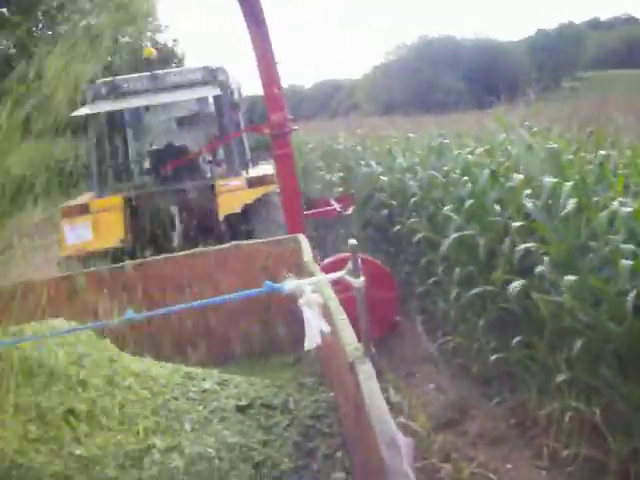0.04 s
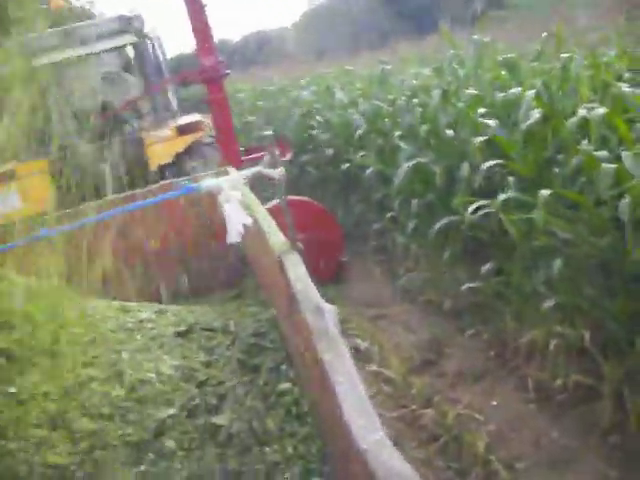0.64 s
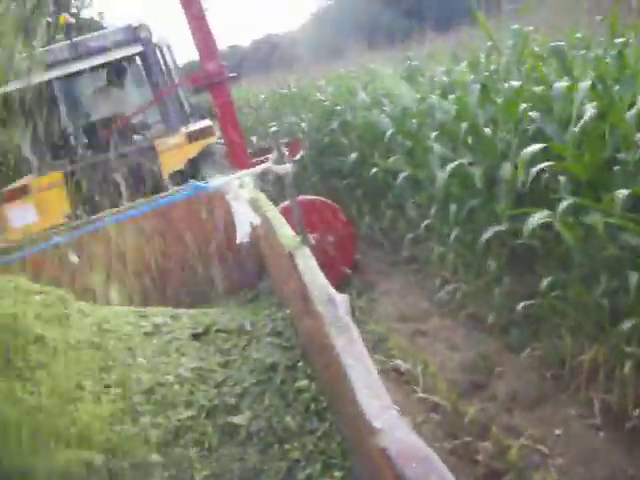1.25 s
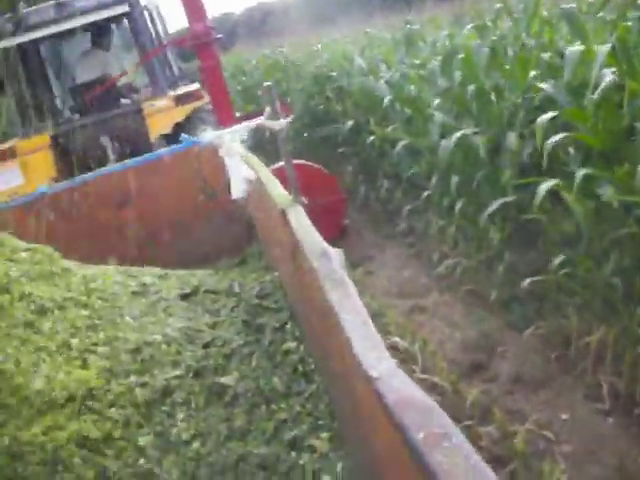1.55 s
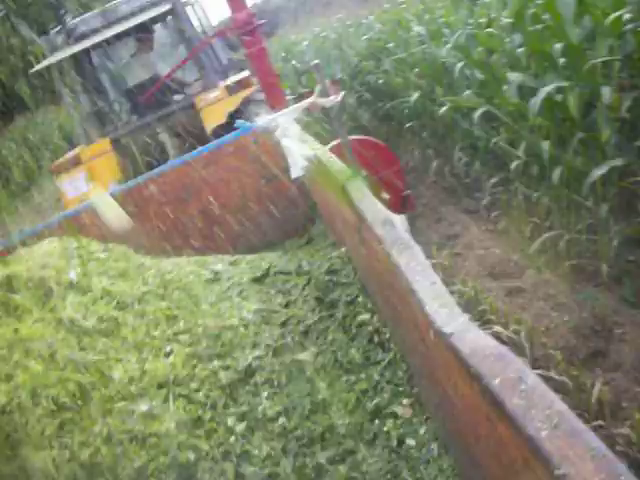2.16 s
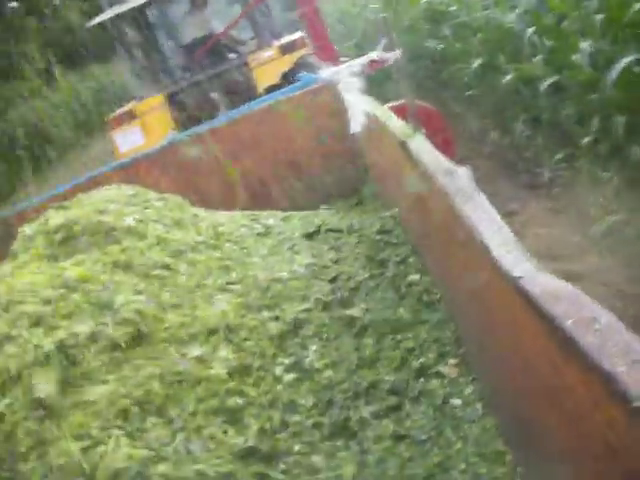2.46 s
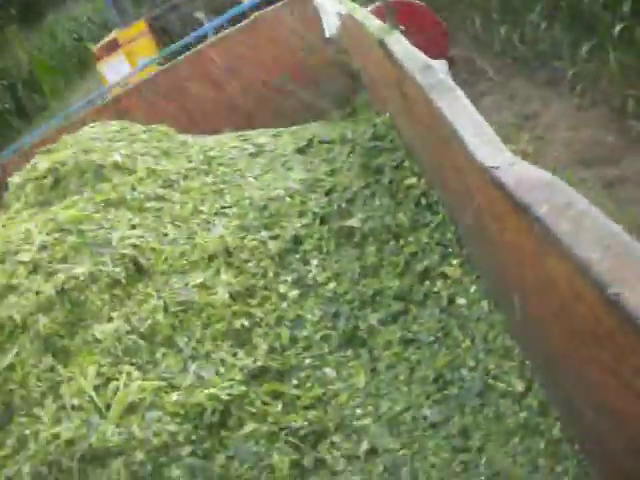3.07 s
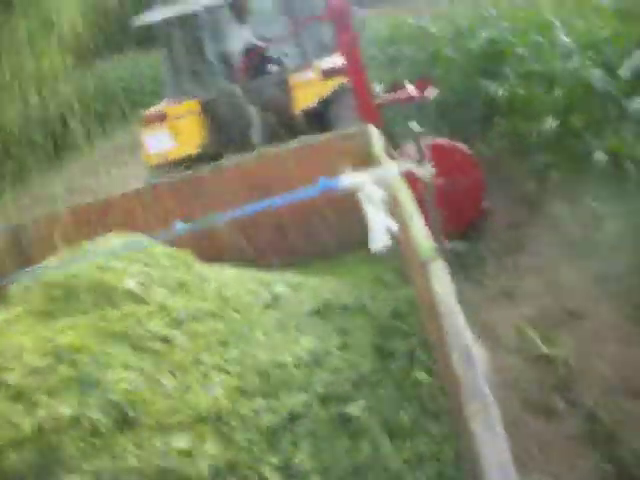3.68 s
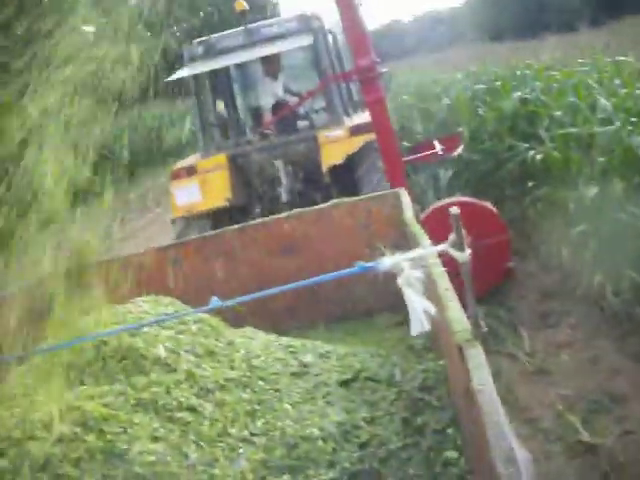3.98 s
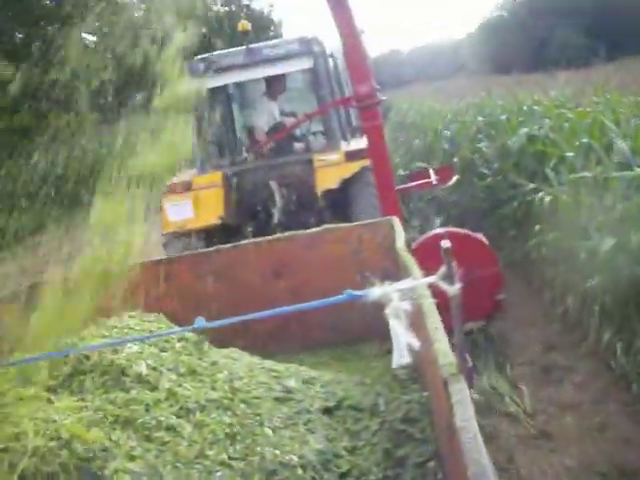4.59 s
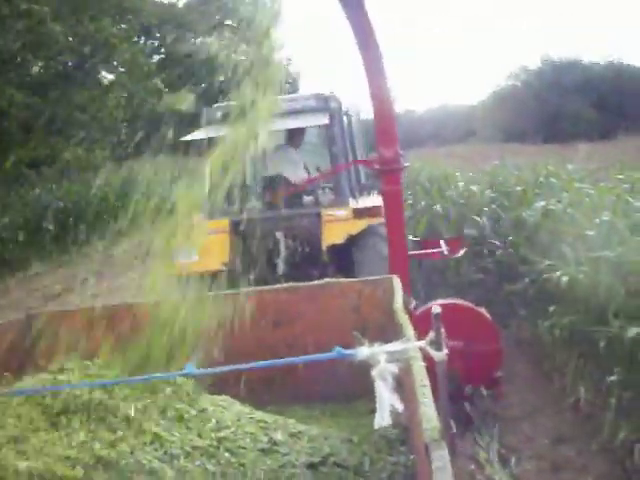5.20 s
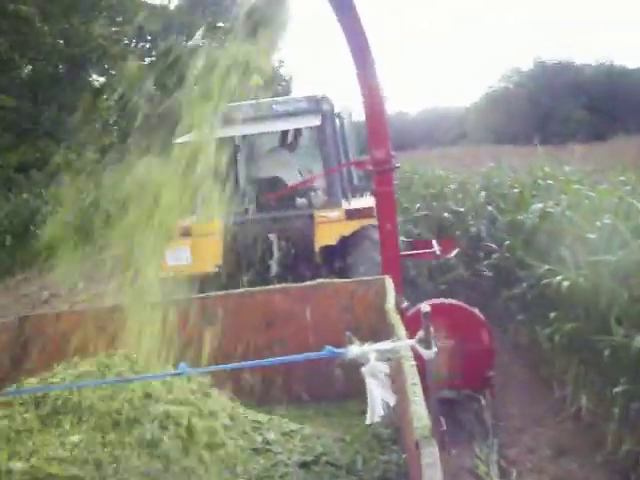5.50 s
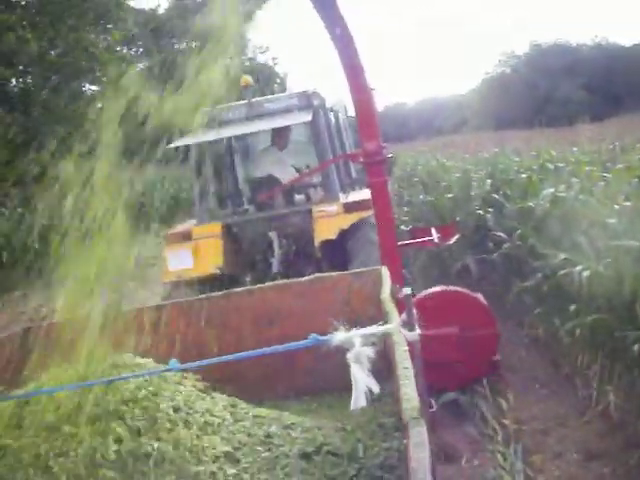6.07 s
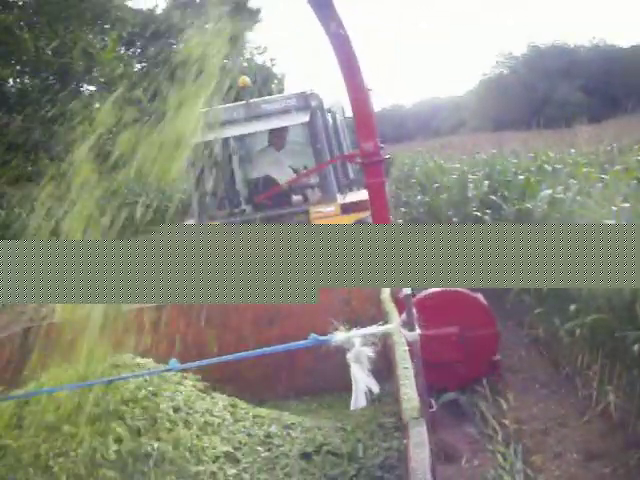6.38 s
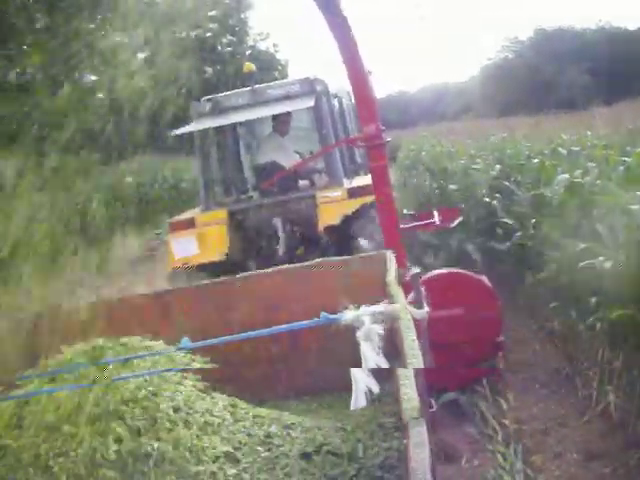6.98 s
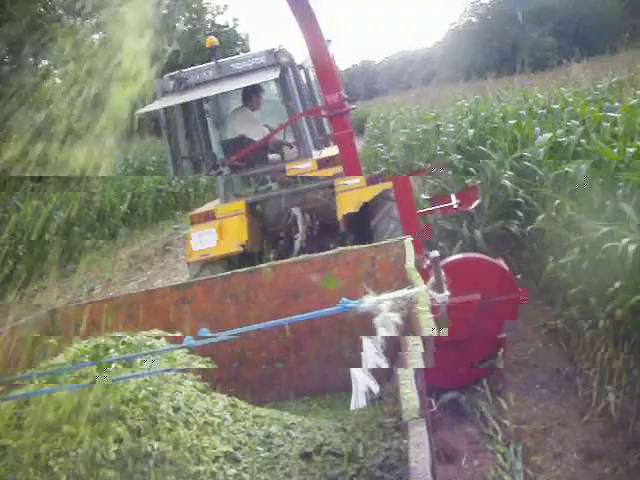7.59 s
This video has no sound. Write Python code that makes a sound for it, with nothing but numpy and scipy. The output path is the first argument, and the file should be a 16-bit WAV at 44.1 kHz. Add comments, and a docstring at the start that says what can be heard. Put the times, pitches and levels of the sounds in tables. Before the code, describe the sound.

A tractor-driven forage harvester howls and rasps through maize, spraying chaff, until the sound cuts out and turns into loud, gritty static.

```python
"""In a trailer being filled by a tractor-driven forage harvester cutting maize.
The chopper's flywheel howls over the diesel's hum and sags under load. Stalks rasp through the knives,
steel squeals, the spout roars and its draught buffets the microphone. Chaff sprays in and taps the camera.
Near the end the small camera fails: its sound sticks, then turns into loud, gritty static."""
import sys
import numpy as np
from scipy import signal
from scipy.fft import rfft, irfft, next_fast_len
from scipy.io import wavfile
from scipy.ndimage import uniform_filter1d

SR = 44100
rng = np.random.default_rng(int(sys.argv[2]) if len(sys.argv) > 2 else 0)


def digitize_waveform(pressure):
    """Quantize a signal to 16-bit integers and store it at the path in sys.argv[1].

    Rows of a 2-D input are taken as channels; values are limited to [-1, 1].
    """
    field = np.atleast_2d(pressure).T
    bounded = np.clip(field, -1, 1)
    quanta = np.round(bounded * 32767).astype(np.int16)
    wavfile.write(sys.argv[1], SR, quanta)


N = 346185
TIME = np.arange(N) / SR

# camera direction: time_s, aim (0 down in the trailer, 1 facing the tractor)
CAMERA_AIM = [(0, 0.87), (.35, 0.5), (1.2, 0.4), (2.1, 0.034), (3.15, 0.066), (3.65, 0.93), (4.5, 0.98),
              (6.1, 1)]
# stalks entering the knives: time_s, feed_db (0 = usual feed)
STALK_FEED = [(0, 5.5), (.3, -1), (.7, 0.5), (1.1, -4.5), (1.4, -1), (2.3, .5), (2.8, 1), (3.25, 2.5),
              (3.7, 4), (3.97, 0), (4.3, 1), (4.7, -6), (5.4, -8.5), (5.75, -11), (6.1, -7.5)]


def undb(db):
    """Decibels to gain."""
    return 10 ** (np.asarray(db) / 20)


def unit(x):
    """Scale to rms 1."""
    return x / np.sqrt(np.mean(x ** 2))


def curves(table):
    """Each column after time_s, interpolated per sample."""
    time_s, *columns = np.transpose(table)
    return [np.interp(TIME, time_s, column) for column in columns]


def walk(rate_hz):
    """Smooth random wander, rms 1."""
    steps = rng.standard_normal(4096)
    path = np.interp(TIME * rate_hz, np.arange(len(steps)), steps)
    return unit(uniform_filter1d(path, int(SR / rate_hz)))


def swell(peak_s, length_s):
    """Half-cosine rise and fall, 1 at peak_s."""
    return np.cos(np.pi * np.clip((TIME - peak_s) / length_s, -.5, .5))


def impacts(per_s, spread_db):
    """Random impulses: many small, a few large."""
    hits = rng.random(N) < per_s / SR
    return hits * undb(spread_db * np.minimum(rng.exponential(size=N), 4.5))


def shape(x, gain):
    """Filter x by gain(hz); rms 1."""
    size = next_fast_len(N)
    hz = np.arange(size // 2 + 1) * SR / size + 1
    return unit(irfft(rfft(x, size) * gain(hz), size)[:N])


def colour(x, spectrum):
    """Filter x by a curve of (freq_hz, level_db) points; rms 1."""
    hz, db = np.transpose(spectrum)
    return shape(x, lambda f: undb(np.interp(np.log(f), np.log(hz), db)))


def ring(x, modes):
    """Drive resonances of alternating polarity with x; rms 1."""
    return shape(x, lambda f: sum((-1) ** i * undb(db) / (1 + 1j * (f - hz ** 2 / f) / width_hz)
                                  for i, (hz, width_hz, db) in enumerate(modes)))


def gusts():
    """Envelope of the strong gusts in the spout's draught."""
    # peak_s, length_s, peak_db
    gust_events = [(.73, 0.55, -18.5), (3.997, 0.27, -20.5), (4.62, 0.34, -31), (5.3, 0.13, -23.5),
                   (5.63, 0.42, -26)]
    return sum(undb(db) * swell(peak_s, length_s) ** 2 for peak_s, length_s, db in gust_events)


def wind(draught_db=-36, facing_db=3, buffet_db=1.6):
    """The spout's draught buffets the microphone, less so down in the trailer."""
    # wind noise: freq_hz, level_db
    spectrum = [(8, -6), (22, -2), (45, 3), (110, 0.5), (200, -4.5), (350, -4.5), (700, -15.5),
                (3000, -45.5)]
    aim, = curves(CAMERA_AIM)
    draught = undb(draught_db + facing_db * aim + buffet_db * walk(8.8))
    return np.hypot(draught, gusts()) * colour(rng.standard_normal(N), spectrum)


def diesel(firing_hz=71, level_db=-28.5, db_per_feed_db=-.4, facing_db=-2, wander_db=.5, drift_rad=.33):
    """The governed engine hums at its firing rate, fuller down in the trailer and on thin feed."""
    # firing_multiple, level_db
    partials = [(1, -0.5), (1.5, -11.5), (2, -13), (5, -12.5)]
    feed_db, = curves(STALK_FEED)
    aim, = curves(CAMERA_AIM)
    hum_db = level_db + db_per_feed_db * feed_db + facing_db * aim + wander_db * walk(3.2)
    phase = 2 * np.pi * firing_hz * TIME + drift_rad * walk(3.6)
    return np.sqrt(2) * sum(undb(hum_db + db) * np.sin(k * phase) for k, db in partials)


def taps(contact_s=.00022, small_db=-17, small_max_db=-5):
    """Soft pieces of maize strike the camera's case: one short push each, with a rebound."""
    # time_s, peak_db
    large_pieces = [(0.066, -5), (.661, 4), (1.775, 0), (2.479, -15), (2.686, -16), (3.256, -3),
                    (3.749, -6), (3.822, -4), (3.960, -1), (4.046, -10), (4.087, -34), (4.214, -24),
                    (4.671, 8.5), (5.008, -1), (5.190, 3), (5.244, -9), (5.443, -3.5), (5.611, 0),
                    (5.894, -17)]
    blows = np.minimum(undb(small_db) * impacts(per_s=24, spread_db=3), undb(small_max_db))
    for time_s, db in large_pieces:
        blows[int(time_s * SR)] += undb(db)
    u = np.arange(-128, 129) / SR / contact_s
    push = (1 - .44 * u ** 2) * np.exp(-u ** 2 / 2)
    return -np.convolve(blows, push, "same")


def chaff_flow(feed_db, level_db=-26, db_per_feed_db=.07, uneven_db=1.3, rise_s=.027, fall_s=.062):
    """Chaff envelope: a stream that follows the feed and is blown aside by gusts, plus spurts."""
    # thick spurts landing near the camera: peak_s, peak_db
    spurts = [(0.031, -21.5), (.31, -24), (.44, -25.5), (.58, -21), (.81, -22.5), (1.12, -25.5),
              (1.28, -28), (2.46, -24), (2.661, -24), (3.01, -21.5), (3.2, -24), (3.31, -26.5), (3.48, -27),
              (3.85, -28), (4.28, -22.5), (4.5, -23.5), (4.68, -24.5), (4.88, -22), (5.02, -27.5),
              (5.36, -26.5), (5.51, -21.5), (5.86, -27.5)]
    stream = undb(level_db + db_per_feed_db * feed_db + uneven_db * walk(11))
    stream /= 1 + gusts() / undb(-16)  # a -16 dB gust halves it
    power = stream ** 2
    for peak_s, db in spurts:
        age_s = TIME - peak_s
        width_s = np.where(age_s < 0, rise_s, fall_s)
        power += undb(db) ** 2 * np.exp(-np.minimum((age_s / width_s) ** 2, 20))
    return np.sqrt(power)


def chaff_spray(settle_s=.005, flicker_db=.9):
    """Chaff lands on the heap: dense ticks and a hiss that jumps as each clump hits and settles."""
    # falling chaff: freq_hz, level_db
    spectrum = [(400, -15), (1500, 2), (2500, 0), (3200, -2.5), (3700, -3.5), (4800, -4.5), (5500, -2),
                (6200, -1.5), (7500, -51)]
    ticks = impacts(per_s=2500, spread_db=3) * rng.standard_normal(N)
    landings = impacts(per_s=60, spread_db=2)
    clumps = signal.lfilter([1], [1, -np.exp(-1 / (settle_s * SR))], landings)
    hiss = rng.standard_normal(N) * np.sqrt(1 + clumps)
    return unit(colour(ticks, spectrum) + colour(hiss, spectrum)) * undb(flicker_db * walk(40))


def side_wall(x, base_s=.0045, turn_s=.0007, sway_s=.00005, echo_gain=.27):
    """Echo off the trailer's steel side; the path changes as the camera turns and sways."""
    aim, = curves(CAMERA_AIM)
    lag_s = base_s + turn_s * aim + sway_s * walk(3)
    return (x + echo_gain * np.interp(TIME - lag_s, TIME, x)) / np.hypot(1, echo_gain)


def squeals(waver_hz=5.6, chatter_db=3):
    """Steel rubs on steel in the chopper: thin tones swell, chatter and fade."""
    # peak_s, length_s, pitch_hz, level_db
    rubs = [(0.102, .35, 2015, -37.5), (0.103, .35, 1734, -30.5), (1.11, .5, 2300, -30.5),
            (1.13, 0.51, 1428, -27), (3.37, .15, 1990, -30), (3.501, .22, 2280, -32),
            (4.763, .14, 2620, -31.5)]
    out = 0
    for peak_s, length_s, hz, db in rubs:
        phase = 2 * np.pi * np.cumsum(hz + waver_hz * walk(25)) / SR
        out += undb(db) * swell(peak_s, length_s) * np.sin(phase)
    return np.sqrt(2) * out * undb(chatter_db * walk(50))


def knife_rasp(cycles, cuts_per_cycle=3, scatter_s=.00009, force_db=1.5, tear_gain=2.4, tear_depth=.79):
    """Knives shear stalks with uneven timing and force; torn fibres hiss once a cycle."""
    # chopper housing resonances: freq_hz, width_hz, level_db
    housing_modes = [(1421, 61, 10), (1768, 140, 1.5), (1982, 81, 1.5), (2350, 374, -1)]
    rate_hz = np.gradient(cycles) * SR
    cut_count = np.floor(cuts_per_cycle * (cycles + rate_hz * scatter_s * walk(45)))
    cuts = np.diff(cut_count, prepend=cut_count[0]) * undb(force_db * rng.standard_normal(N))
    fibres = rng.standard_normal(N) * (1 + tear_depth * np.cos(2 * np.pi * cycles))
    return unit(ring(cuts, housing_modes) + tear_gain * ring(fibres, housing_modes))


def blower(cycles, throb_depth=.21, surge_db=2.5):
    """Air and crop roar up the spout, throbbing with the paddles."""
    # spout resonances: freq_hz, width_hz, level_db
    spout_modes = [(102, 43, -1.5), (310, 110, -5.5), (546, 140, -1.5), (709, 42, 2.5), (857, 70, 1.5),
                   (1115, 145, 4.5), (1240, 490, -2)]
    # time_s, level_db
    roar_levels = [(0, -24), (.5, -22), (1.15, -26), (2.7, -27), (3.0, -19.5), (3.3, -25.5), (3.55, -21),
                   (3.9, -20), (4.05, -24), (4.45, -23.5), (5.0, -20.5), (5.7, -20.5), (6.1, -24.5)]
    roar_db, = curves(roar_levels)
    air = rng.standard_normal(N) * (1 + throb_depth * np.cos(2 * np.pi * cycles))
    return ring(air, spout_modes) * undb(roar_db + surge_db * walk(30))


def flywheel(free_hz=97.02, judder_per_hz=.0014):
    """Cycles run and sag in rate; the more the crop drags the wheel down, the more it judders."""
    # flywheel fundamental: time_s, rate_hz
    speed = [(0, 96.25), (.15, 96.3), (.33, 94.35), (.88, 94.03), (1.02, 95.2), (1.2, 95.9), (1.62, 96.33),
             (2.88, 97.04), (3.12, 95.55), (3.4, 96), (3.87, 93.77), (4.15, 96), (4.32, 93.53),
             (4.6, 93.26), (4.76, 94.5), (5.1, 94), (5.75, 95.84), (6.1, 96.6)]
    rate_hz, = curves(speed)
    sag_hz = np.maximum(free_hz - rate_hz, 0)
    cycles = np.cumsum(rate_hz * (1 + judder_per_hz * sag_hz * walk(16))) / SR
    return cycles, sag_hz


def howl(cycles, sag_hz, feed_db, wander_db=1.88, jitter_rad=.089, smear_rad=.25, growl_rad_per_hz=.25):
    """Flywheel harmonics: they shift with feed and camera aim, and flutter more under load."""
    # harmonic, down_db, facing_db, db_per_feed_db, db_per_sag_hz
    harmonics = [(2, -33.5, -37, -0.5, 0.5), (3, -25.5, -36.5, -0.7, 0), (4, -29, -23.5, -0.18, -2.5),
                 (5, -29.5, -33.5, -.8, -1.84), (7, -34, -23.5, 0.02, -2.4), (8, -41.5, -39.5, 0, -0.5),
                 (10, -39.5, -35.5, 1.9, -2), (11, -32.5, -35, 0.5, 0.5), (12, -25.5, -30.5, 0.5, -2.5),
                 (14, -46.5, -37.5, 1.5, 0.5), (15, -33.5, -36, -0.4, -2), (16, -37.5, -48, 2.9, -3),
                 (18, -35, -42, 3, -3), (21, -38, -40.5, -0.2, -0.5), (24, -40.5, -44.5, 0.5, 1.5)]
    # 6th harmonic, near a spout resonance, growls under load: time_s, level_db
    sixth = [(0, -23.5), (.2, -35), (.45, -24.5), (.7, -28), (.95, -24), (1.35, -26), (1.75, -30),
             (2.7, -33), (3.6, -32.5), (3.8, -26), (4.3, -32.5), (5.42, -24.5), (5.68, -35.5), (6.1, -29)]
    # 9th harmonic, the main whine: time_s, level_db
    ninth = [(0, -38), (.6, -24), (1.25, -27), (1.52, -24.5), (2.15, -24), (2.7, -28), (3.1, -25),
             (3.6, -28), (4.4, -24.5), (4.7, -19.5), (5.05, -25), (5.75, -20), (6.1, -24.5)]
    aim, = curves(CAMERA_AIM)
    tones = [(6, curves(sixth)[0], growl_rad_per_hz * sag_hz), (9, curves(ninth)[0], 0)]
    for k, down_db, facing_db, db_per_feed_db, db_per_sag_hz in harmonics:
        aimed_db = down_db + aim * (facing_db - down_db)
        load_db = db_per_feed_db * feed_db + db_per_sag_hz * sag_hz
        tones.append((k, aimed_db + load_db + wander_db * walk(3.478), 0))
    flutter_db = 1.18 + .09 * sag_hz
    out = 0
    for k, db, growl_rad in tones:
        # uneven feeding blurs the highest tones
        blur_rad = min(jitter_rad * (1 + (k / 9.5) ** 8), 1) + growl_rad
        # one pulse a cycle; upper tones leave the spout later
        phase = 2 * np.pi * k * cycles - smear_rad * k ** 2 + blur_rad * walk(30)
        out += undb(db + flutter_db * walk(21.96)) * np.sin(phase)
    return np.sqrt(2) * out


def scene(rasp_db=-26):
    """Mono mix; the flywheel times howl, cuts and blower, the feed scales rasp and chaff."""
    cycles, sag_hz = flywheel()
    feed_db, = curves(STALK_FEED)
    crop = undb(rasp_db + feed_db) * knife_rasp(cycles) + chaff_flow(feed_db) * chaff_spray()
    chopper = howl(cycles, sag_hz, feed_db) + blower(cycles) + squeals()
    return (chopper + side_wall(crop) + taps() + diesel() + wind())[None]


def gain_control(x, target_db=-15.5, strength=.73, window_s=.091):
    """The camera pulls the loudness towards one level."""
    power = uniform_filter1d(x ** 2, int(window_s * SR)) + 1e-9
    return x * (undb(target_db) / np.sqrt(power)) ** strength


def camera_fault(stored, rate_hz, full_scale, stuck_s=6.1203, static_s=6.5592):
    """The data stick near negative full scale, then turn to random codes."""
    time_s = np.arange(len(stored)) / rate_hz
    codes = rng.uniform(-1.025, 1, len(stored))
    # logarithmic decoding: mostly small values, a few huge, hence the grit
    static = np.sign(codes) * (256 ** np.abs(codes) - 1) / 255
    broken = full_scale * np.where(time_s < static_s, -.99, static)
    return np.where(time_s < stuck_s, stored, broken)


def record(dry, rate_hz=11025, full_scale=.7, top_hz=15800):
    """The camera levels the sound, rounds its peaks, samples at a low rate and fails."""
    step = SR // rate_hz
    levelled = gain_control(dry[0])
    rounded = levelled / (1 + (levelled / full_scale) ** 10) ** (1 / 10)
    stored = camera_fault(signal.resample_poly(rounded, 1, step), rate_hz, full_scale)
    anti_image = signal.firwin(129, 5480, window=("kaiser", 9), fs=SR)
    upsampled = signal.resample_poly(stored, step, 1, window=anti_image)[:N]
    clipped = np.clip(upsampled, -full_scale, full_scale)
    lowpass = signal.ellip(10, .1, 80, top_hz, fs=SR, output="sos")
    return signal.sosfilt(lowpass, clipped)[None]


dry = scene()
out = record(dry)
digitize_waveform(out)
```